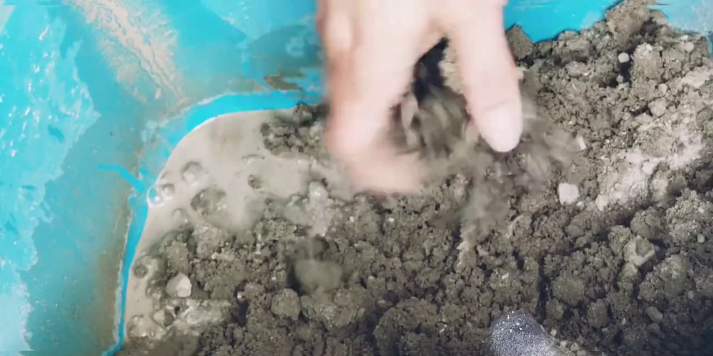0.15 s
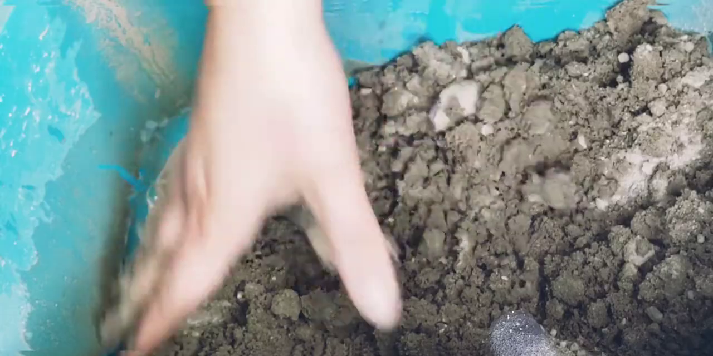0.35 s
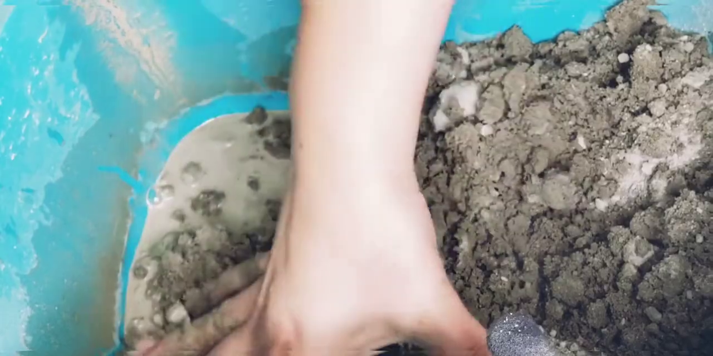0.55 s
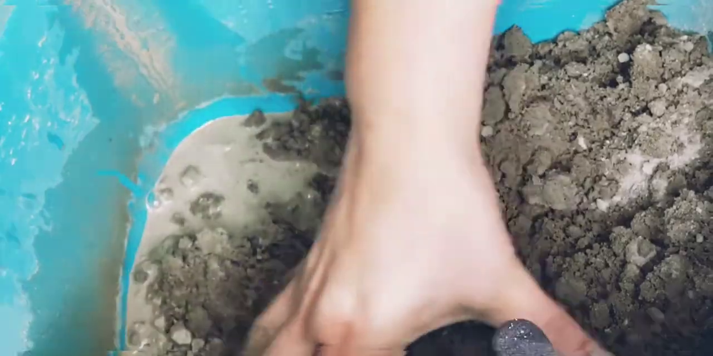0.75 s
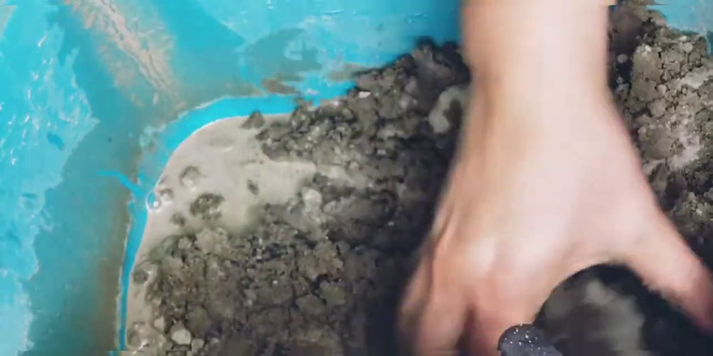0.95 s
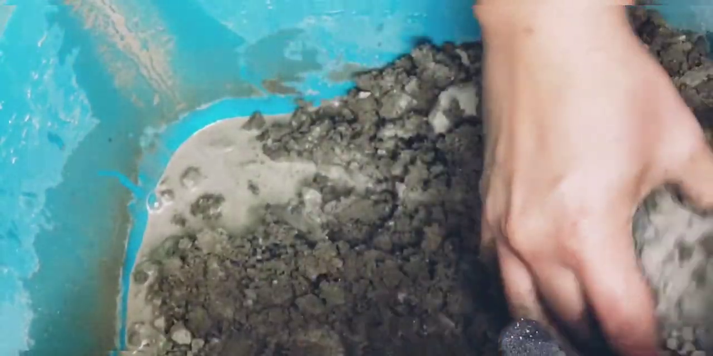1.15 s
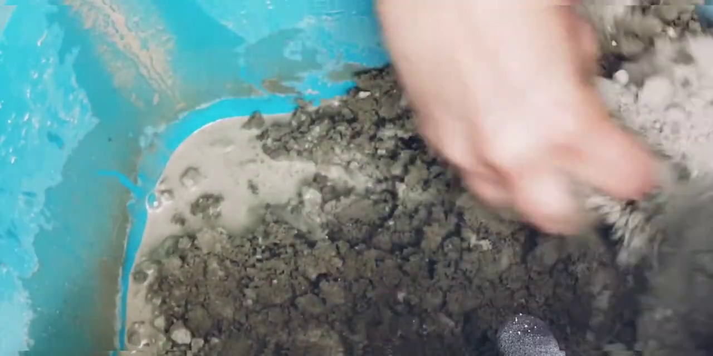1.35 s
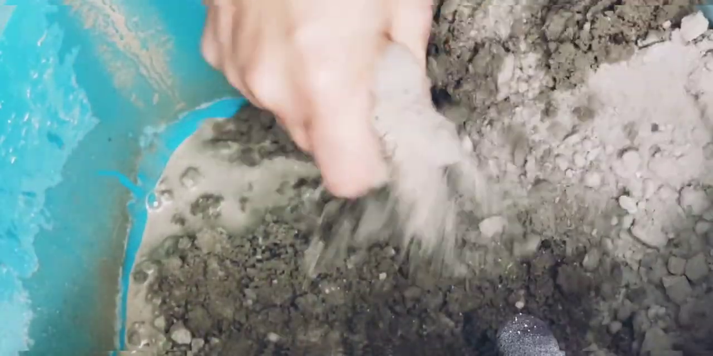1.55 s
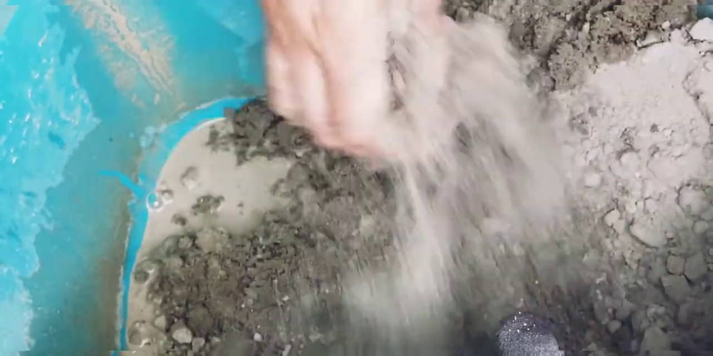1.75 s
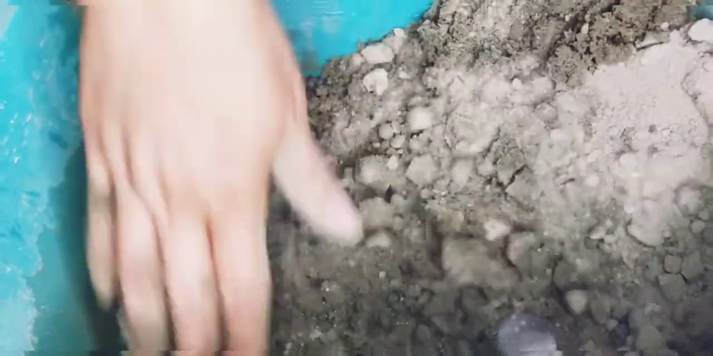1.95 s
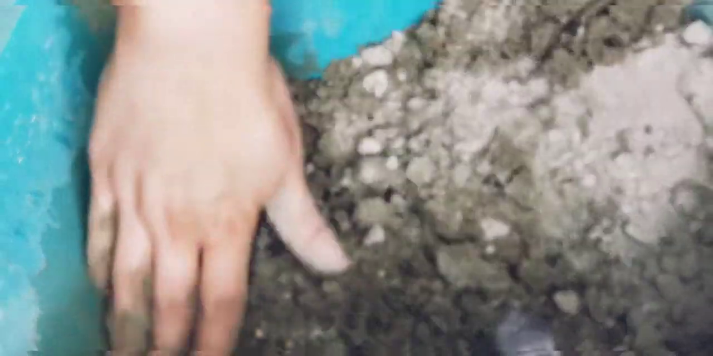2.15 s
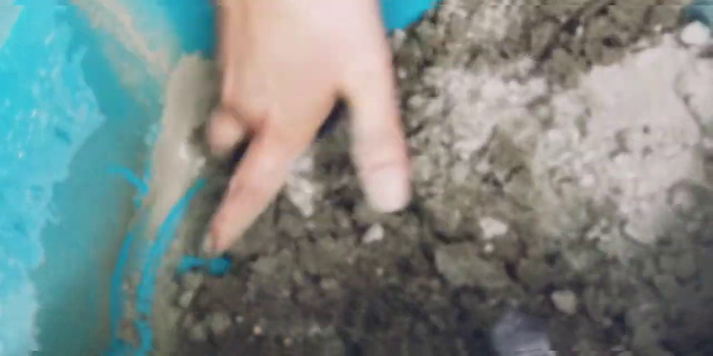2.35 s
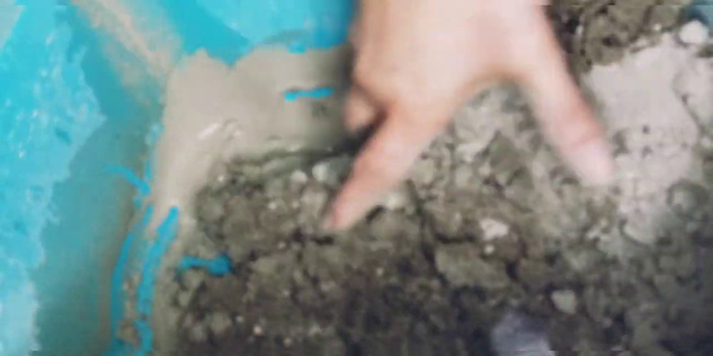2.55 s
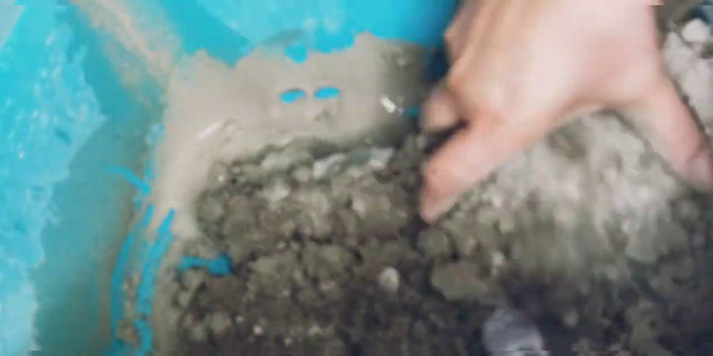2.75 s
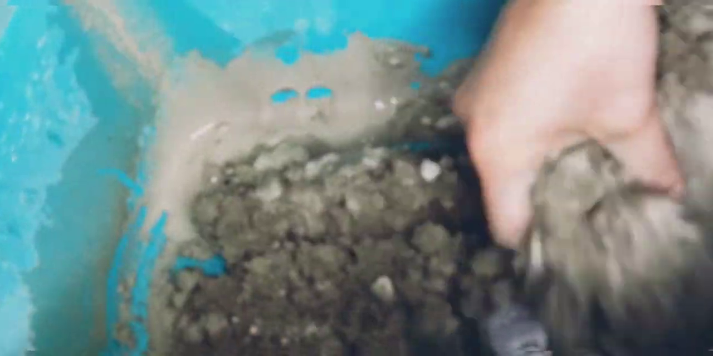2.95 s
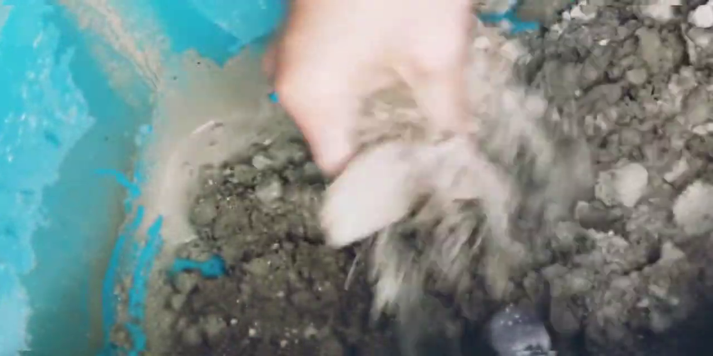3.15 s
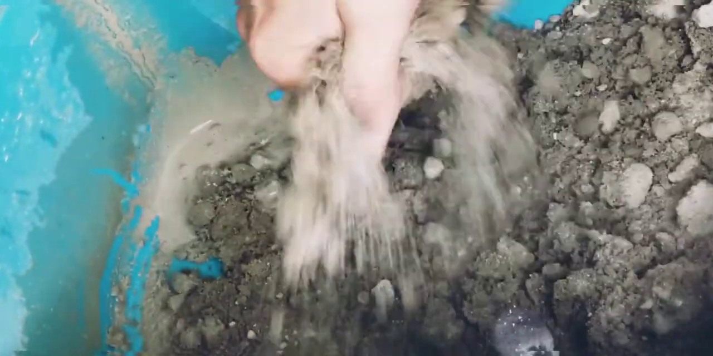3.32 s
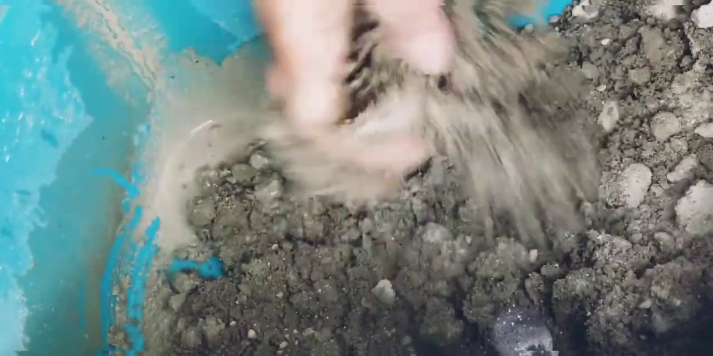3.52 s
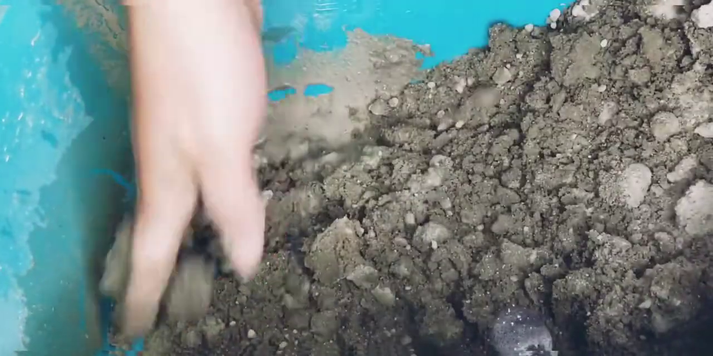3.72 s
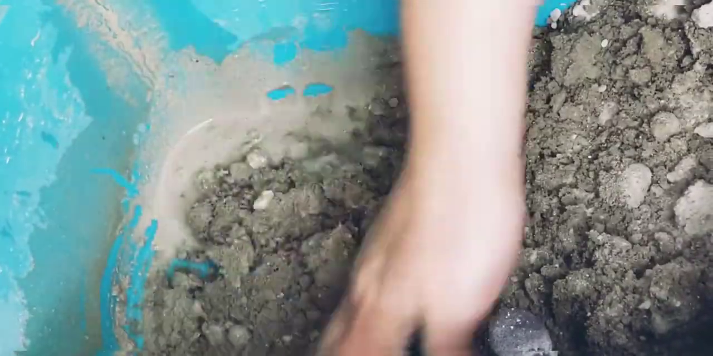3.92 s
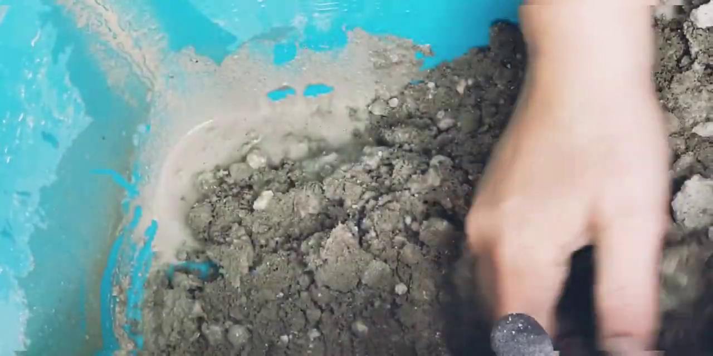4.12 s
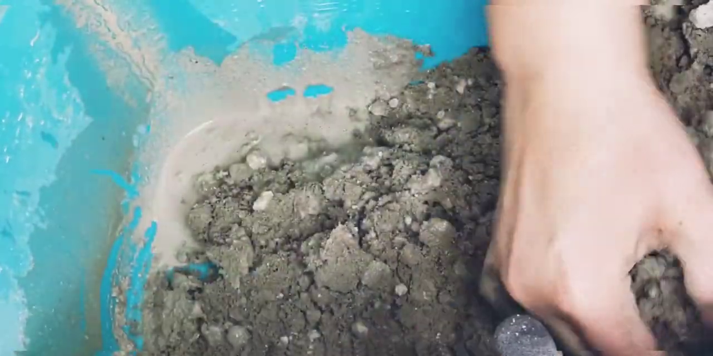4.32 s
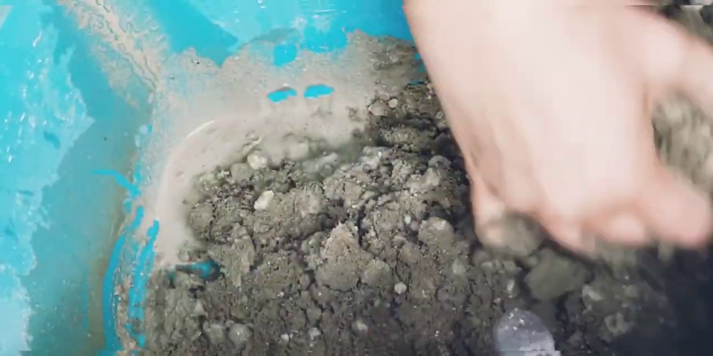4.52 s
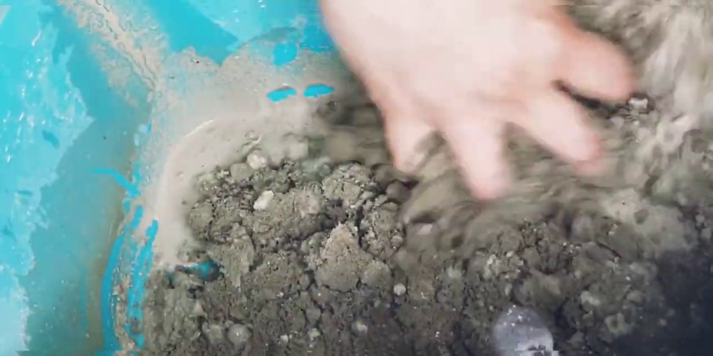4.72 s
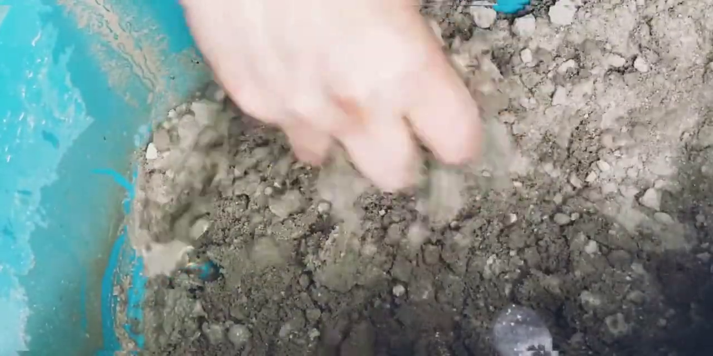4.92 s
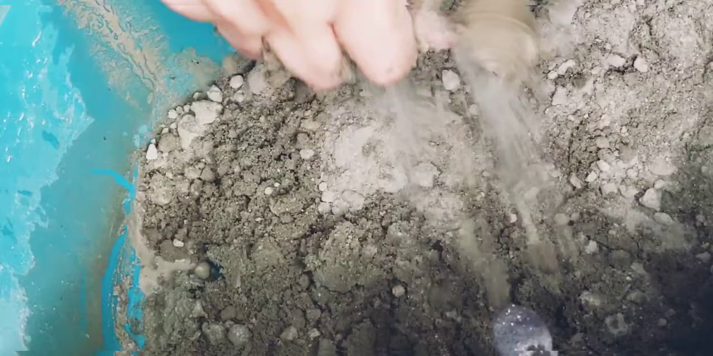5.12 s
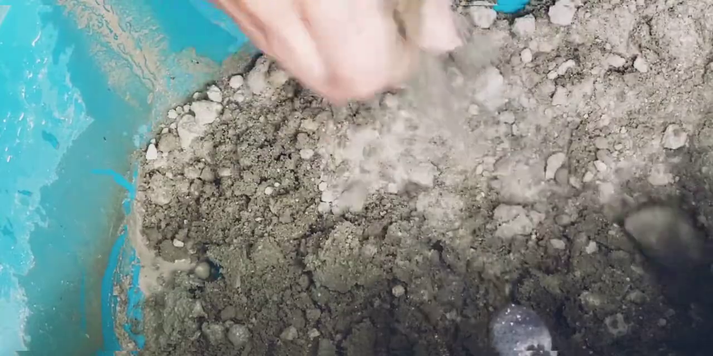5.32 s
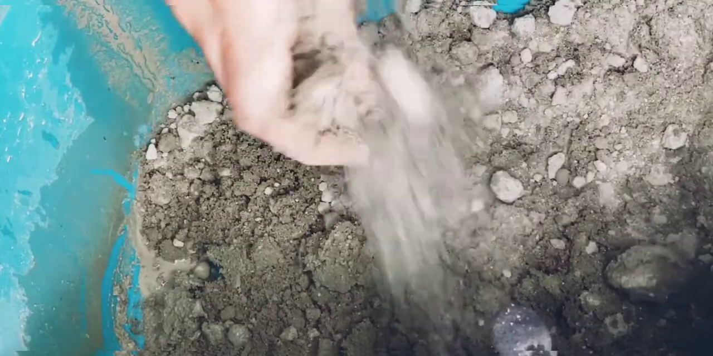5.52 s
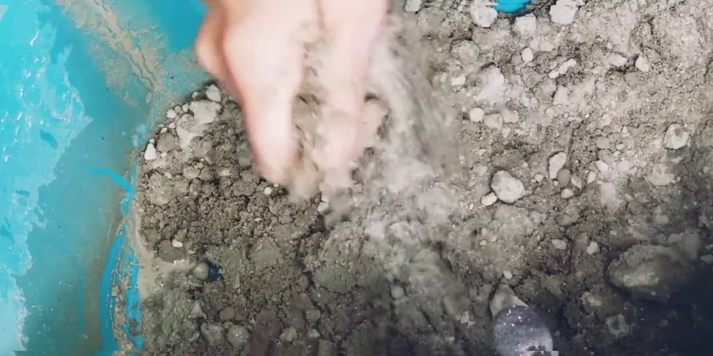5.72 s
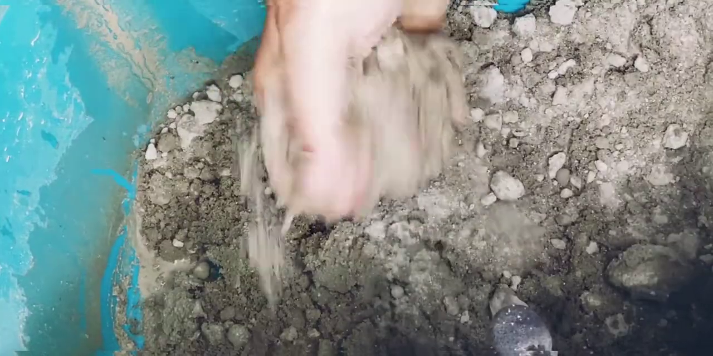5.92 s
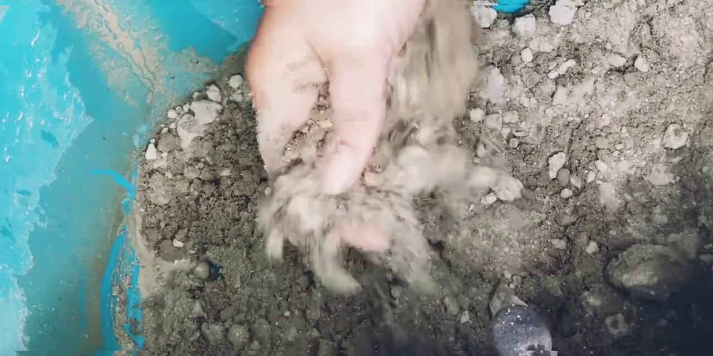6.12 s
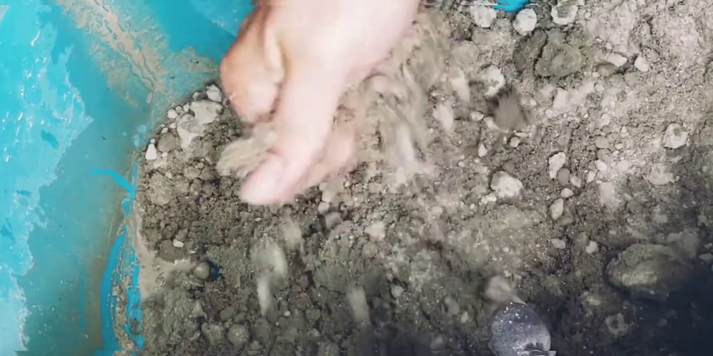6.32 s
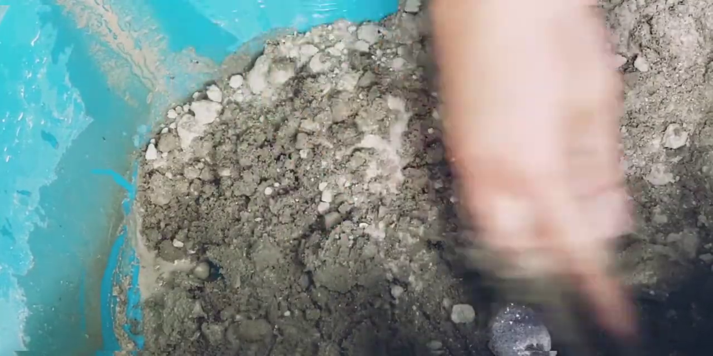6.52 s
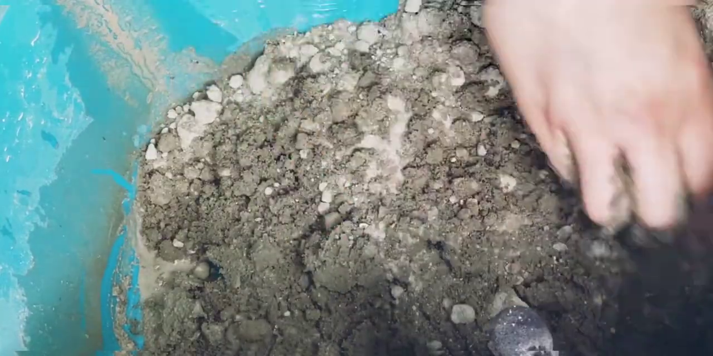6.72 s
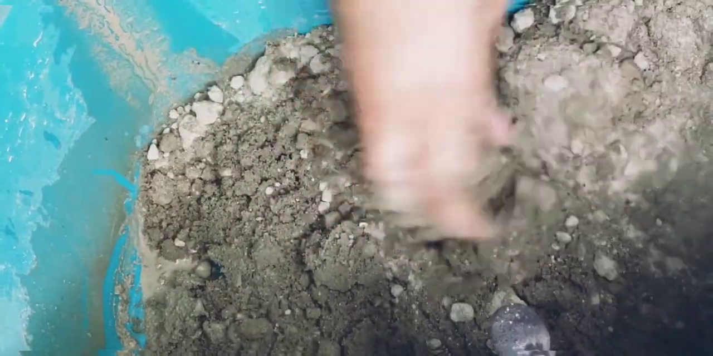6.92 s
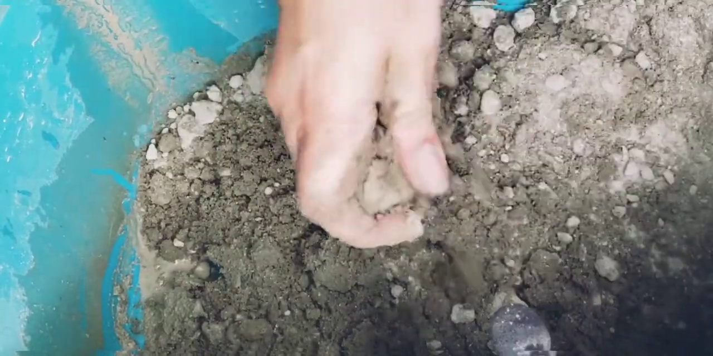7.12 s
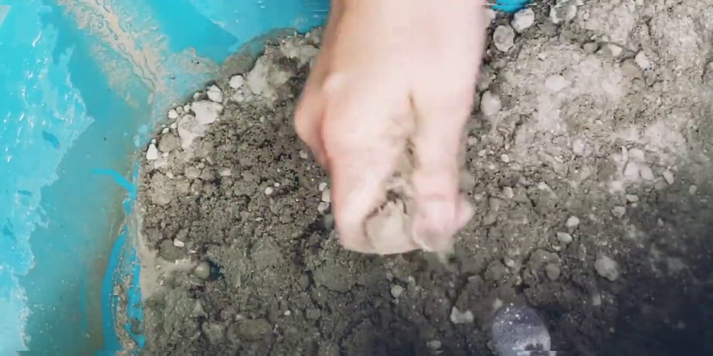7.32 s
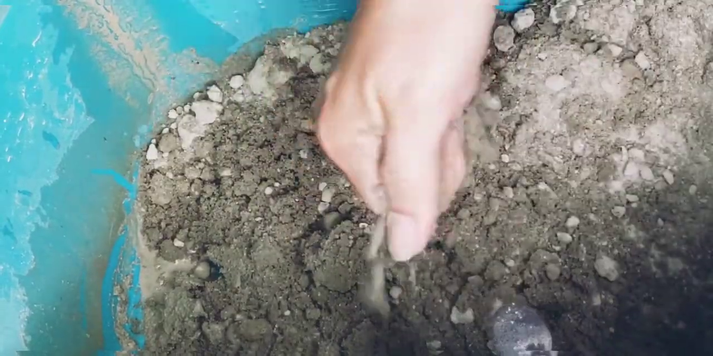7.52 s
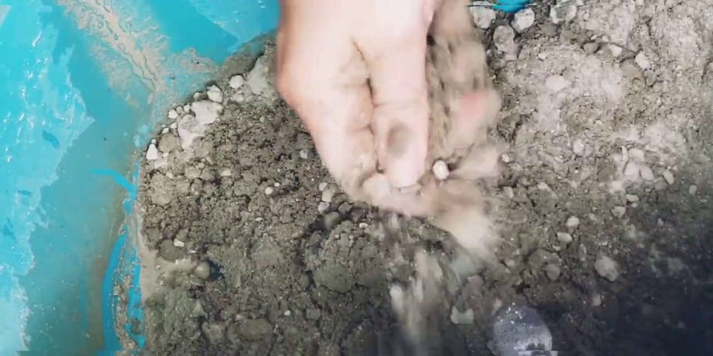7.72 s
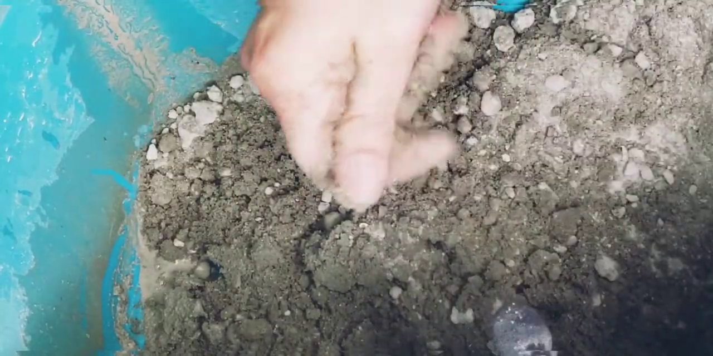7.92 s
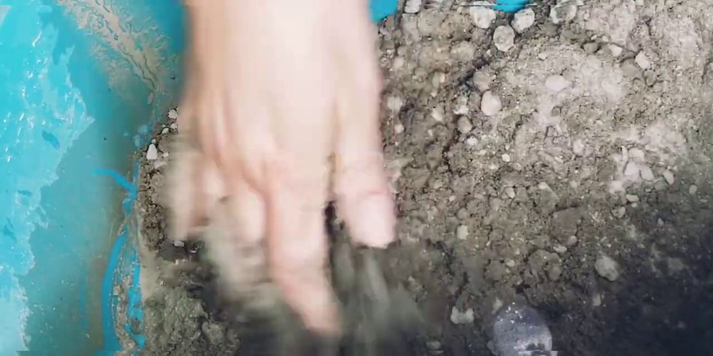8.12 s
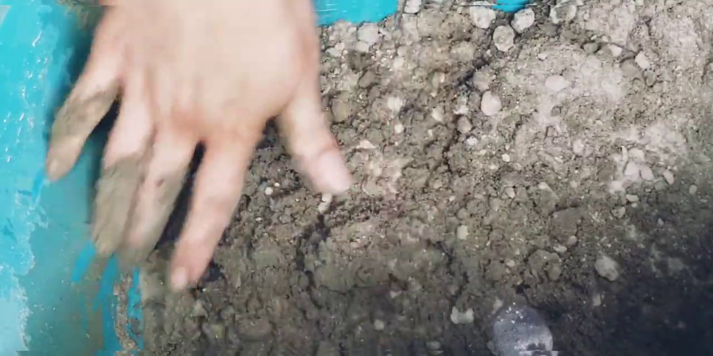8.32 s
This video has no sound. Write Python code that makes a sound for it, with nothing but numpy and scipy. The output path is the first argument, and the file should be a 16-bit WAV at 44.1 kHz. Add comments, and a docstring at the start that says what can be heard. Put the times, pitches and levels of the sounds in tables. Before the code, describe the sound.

Close-up rustling of powder and crumbly soil in a plastic tub: raspy raking strokes, cracking lumps, one brief squeak, and quieter sprinkling.

```python
"""A hand works dry powder and gritty crumbs in a plastic tub, close to a stereo microphone; rumble, hum and hiss stay under it.
Dust falls over a trickle of grain noise heard throughout; from 0.4 s strokes of coloured grains and ringing crumbs rake the floor
with resonant rasps, and clods knock as damped sines, thickly at 1.4 s and loudest at 1.7 s; a lump jolts the tub at 3.3 s.
A third stroke holds one stick-slip squeak at 4.1 s and more knocks; more dust bursts come from 5.5 s,
then a faint stroke at 6.5 s, more knocks at 7.5 s, and a last stroke that swells to the end; hard hits ring the tub's modes."""
import sys
import numpy as np
from scipy import signal
from scipy.fft import rfft, irfft
from scipy.io import wavfile

SR = 44100
rng = np.random.default_rng(int(sys.argv[2]) if len(sys.argv) > 2 else 0)


def digitize_waveform(pressure):
    """Quantize a signal to 16-bit integers and store it at the path in sys.argv[1].

    Rows of a 2-D input are taken as channels; values are limited to [-1, 1].
    """
    field = np.atleast_2d(pressure).T
    bounded = np.clip(field, -1, 1)
    quanta = np.round(bounded * 32767).astype(np.int16)
    wavfile.write(sys.argv[1], SR, quanta)


def linear_from_db(decibels):
    """Turn decibels (scalar or array-like) into linear amplitude factors; 0 gives 1."""
    return 10 ** (np.asarray(decibels, float) / 20)


N = 368676  # samples


def rms_one(x):
    """Scale to unit rms."""
    return x / np.sqrt(np.mean(x ** 2) + 1e-20)


def in_time(rows):
    """Each column of a table as a curve over all samples."""
    s, *columns = np.transpose(rows)
    return [np.interp(np.arange(N) / SR, s, c) for c in columns]


def at_hz(points, hz):
    """Read a spectrum on a log-frequency axis."""
    point_hz, values = np.transpose(points)
    return np.interp(np.log(hz + 1), np.log(point_hz), values)


def colour(x, gain_at, size=4096):
    """Causal (minimum-phase) filter with the given gain per frequency, made by folding the cepstrum."""
    cepstrum = irfft(np.log(gain_at(np.fft.rfftfreq(size, 1 / SR)) + 1e-6))
    cepstrum[1:size // 2] *= 2
    cepstrum[size // 2 + 1:] = 0
    return signal.oaconvolve(x, irfft(np.exp(rfft(cepstrum))))[:N]


# How alike the microphone's two channels hear the tub. Each row: frequency in Hz, left-right likeness (1 = same).
CHANNEL_LIKENESS = [(60, 0.95), (250, 0.92), (640, 0.6), (1000, 0.13), (1500, 0.063), (2800, 0.071),
                    (15000, 0.024)]


def stereo(pair, spectrum):
    """Two unrelated streams become a coloured left and right, alike in the bass and nearly unrelated in the treble."""
    hz = np.linspace(0, SR / 2, 2049)
    norm = np.sqrt(np.mean(linear_from_db(at_hz(spectrum, hz)) ** 2) * 2)
    alike = lambda f: np.clip(at_hz(CHANNEL_LIKENESS, f), -.99, .99)
    mid = colour(pair[0], lambda f: linear_from_db(at_hz(spectrum, f)) * np.sqrt(1 + alike(f)) / norm)
    side = colour(pair[1], lambda f: linear_from_db(at_hz(spectrum, f)) * np.sqrt(1 - alike(f)) / norm)
    return np.array([mid + side, mid - side])


def drift(rate_hz):
    """Slow random wander of rms 1: low-passed noise drawn at every 40th sample."""
    r = np.exp(-80 * np.pi * rate_hz / SR)
    noise = rng.standard_normal(N // 40 + 2002)
    slow = signal.lfilter([1], [1, -2 * r, r * r], noise)[2000:]
    return np.interp(np.arange(N) / 40, np.arange(len(slow)), rms_one(slow))


def grains(per_s, spread_db, clump_db, clump_hz):
    """Random contacts of uneven size that come in clumps; two streams, rms 1."""
    born = rng.random((2, N)) < per_s / SR
    sizes = linear_from_db(spread_db * np.minimum(rng.exponential(1, (2, N)), 5)) * rng.standard_normal((2, N))
    return rms_one(born * sizes * linear_from_db(clump_db * drift(clump_hz)))


# Colour of the faint hiss in the pauses. Each row: frequency in Hz, relative level in dB.
HISS_COLOUR = [(100, -31.5), (160, -7.5), (280, -4.5), (350, -16), (500, -17.5), (900, -20), (1500, -23.5),
               (2500, -9), (3300, -18), (4800, -29.5), (6300, -29), (8300, -39), (11800, -9),
               (15800, -13.5)]


def hiss():
    """Steady coloured noise whose level wanders by about a decibel."""
    return linear_from_db(-59 + 1.0 * drift(4.4)) * stereo(rng.standard_normal((2, N)), HISS_COLOUR)


JOLT_RISE_S = 0.0019


def jolt_swing(after_s, level_db, t60_s):
    """A jolt's quick rise and exponential decay, silent before it strikes."""
    return linear_from_db(level_db - 60 * after_s / t60_s) * (1 - np.exp(-after_s / JOLT_RISE_S))


# Low rumble around the tub. Each row: time in seconds, level in dB.
RUMBLE_LEVEL = [(0.0, -48), (0.39, -54), (0.6, -50.5), (1.0, -45.5), (1.51, -45.5), (1.79, -59.5),
                (2.07, -44), (2.5, -45.5), (2.91, -45.5), (3.21, -58.5), (3.54, -47.5), (3.73, -44.5),
                (4.05, -48.5), (4.65, -57.5), (4.77, -53), (5.2, -52), (5.45, -54), (5.82, -46),
                (5.96, -57.5), (6.29, -44.5), (6.6, -50.5), (7.43, -57), (8.36, -45.5)]
# Its two resonances. Each row: frequency in Hz, width of one filter pass in Hz, rumble gain in dB, jolt gain in dB.
LOW_RESONANCES = [(58.2, 29, -0.9, -5.5), (102, 33, -6, 2.5)]
# Jolts of the tub, which also ring in jolt_rings(). Each row: start in seconds, level in dB.
TUB_JOLTS = [(0.431, -36), (2.071, -50), (2.35, -41), (3.322, -30), (3.805, -30), (4.771, -47.5),
             (5.282, -40.5), (5.78, -50), (7.51, -38)]


def rumble():
    """Noise in two low resonances, nearly the same in both channels; jolts swell it and die away."""
    out, t = 0, np.arange(N) / SR
    level_db, = in_time(RUMBLE_LEVEL)
    jolts = sum(jolt_swing(np.maximum(t - s, 0), db, t60_s=0.36) for s, db in TUB_JOLTS)
    for hz, width_hz, rumble_db, jolt_db in LOW_RESONANCES:
        r = np.exp(-np.pi * width_hz / SR)
        noise = rng.standard_normal((2, N + SR))  # the first second lets the filters settle
        for _ in range(2):
            noise = signal.lfilter([1, 0, -1], [1, -2 * r * np.cos(2 * np.pi * hz / SR), r * r], noise)
        mid, side = rms_one(noise[:, SR:])
        level = linear_from_db(level_db + rumble_db) + linear_from_db(jolt_db) * jolts
        out = out + level * (mid + 0.16 * side * np.array([[1], [-1]]))
    return out


# A low hum that comes and goes. Each row: time in seconds, rms level in dB.
HUM_LEVEL = [(0, -53), (0.68, -58), (0.74, -43.5), (1.2, -48), (1.45, -79), (2.3, -49), (2.4, -47),
             (2.93, -54), (3.1, -79), (3.45, -69), (3.6, -45), (4.0, -49), (4.3, -73), (4.95, -53),
             (5.15, -46.5), (5.45, -61), (6.08, -61), (6.2, -43.5), (7.0, -45), (7.12, -58), (7.6, -52.5),
             (8.0, -43.5), (8.36, -43)]


def hum():
    """A sine near 58 Hz whose pitch wavers slightly."""
    cycles = np.cumsum(58.4 + 0.9 * drift(1.55)) / SR
    return linear_from_db(in_time(HUM_LEVEL)[0]) * np.sqrt(2) * np.sin(2 * np.pi * cycles)


def jolt_rings():
    """The first swing of the jolted tub is a clean 64 Hz ring, quickly damped."""
    out, t = np.zeros(N), np.arange(N) / SR
    for s, db in TUB_JOLTS:
        after = np.maximum(t - s, 0)
        out += jolt_swing(after, db + 8, t60_s=0.11) * np.sin(2 * np.pi * 64 * after)
    return out


# A finger slipping once on the plastic. Each row: time in seconds, slips per second, level in dB.
FINGER_SLIPS = [(4.105, 940, -40), (4.12, 835, -25), (4.135, 805, -28), (4.148, 815, -20),
                (4.157, 1120, -23), (4.168, 950, -25), (4.19, 1060, -42)]
# Colour of the squeak. Each row: frequency in Hz, relative level in dB.
SQUEAK_TONE = [(400, -32), (850, 2), (1500, -7), (2450, -1.5), (3300, -4), (4900, -7), (6000, -24)]


def squeak():
    """Uneven stick-slip pulses while the finger drags, smeared by the short rattle of the loaded floor."""
    per_s, level_db = in_time(FINGER_SLIPS)
    t = np.arange(N) / SR
    turns = np.floor(np.cumsum(per_s * (1 + .02 * drift(120) + .06 * drift(500))) / SR)
    slips = np.diff(turns, prepend=0) * linear_from_db(2.5 * rng.standard_normal(N)) * np.sqrt(SR / per_s)
    slips = slips * linear_from_db(level_db) * (t > FINGER_SLIPS[0][0]) * (t < FINGER_SLIPS[-1][0])
    rattles = rng.standard_normal((4, 2, 400)) * linear_from_db(-60 * t[:400] / .012)
    rattles /= 2 * np.linalg.norm(rattles, axis=2, keepdims=True)
    rattles[:, 1] *= .45  # a weaker side stream keeps the channels mostly alike
    # the load shifts under the finger, so the rattle keeps changing
    loads = np.array([drift(35) for _ in rattles])
    loads *= 2 * slips / np.linalg.norm(loads, axis=0)
    rattled = [np.array([signal.oaconvolve(load, r)[:N] for r in pair]) for load, pair in zip(loads, rattles)]
    return stereo(sum(rattled), SQUEAK_TONE)


# Clods dragged over the floor; the row at 4.16 s is the squeak's upper partial near 2 kHz.
# Each row: start in seconds, length in seconds, level in dB, resonance in Hz.
RASPS_AND_PARTIAL = [(0.919, 0.11, -42, 940), (1.072, 0.048, -35, 520), (2.169, 0.13, -35.5, 512),
                     (2.244, 0.15, -36, 2320), (3.007, 0.08, -47, 940), (4.16, 0.038, -32.5, 1820),
                     (2.946, 0.065, -35.5, 985), (7.191, 0.056, -58.5, 1930)]


def rasps():
    """Dense contacts swell and fade in one resonance: dragged clods, and the squeak's upper partial."""
    out = np.zeros((2, N))
    mid, side = grains(4000, 1.2, 1.5, 40)
    for s, length, db, hz in RASPS_AND_PARTIAL:
        at, size = round(s * SR), round(length * SR)
        contacts = [mid[at:at + size], 0.44 * side[at:at + size]]
        rung = signal.lfilter(*signal.iirpeak(hz, 11.5, fs=SR), contacts)
        swell = np.sin(np.linspace(0, np.pi, size))
        out[:, at:at + size] += linear_from_db(db) * swell * rms_one(rung[0] + rung[1] * [[1], [-1]])
    return out


# Ringing modes of the plastic floor. Each row: frequency in Hz, relative level in dB, 60 dB decay in seconds.
FLOOR_MODES = [(218, -14, 0.1), (357, -8, 0.11), (501.5, 1.5, 0.033), (648, -9.5, 0.059),
               (946, -19.5, 0.14), (1485, -8, 0.077), (2780, -6, 0.057)]


def tub(x):
    """The plastic floor rings in its modes, of alternating sign."""
    out = 0
    for k, (hz, level_db, t60) in enumerate(FLOOR_MODES):
        r, w = linear_from_db(-60 / (t60 * SR)), 2 * np.pi * hz / SR
        strike = [0, linear_from_db(level_db) * np.sin(w)]
        out = out + (-1) ** k * signal.lfilter(strike, [1, -2 * r * np.cos(w), r * r], x + 1e-18)
    return out


# Hard clods striking bare plastic. Each row: start in seconds, level in dB, centre of the knock in Hz,
# second resonance in Hz, cycles of ring until 60 dB down.
CLOD_KNOCKS = [(0.415, -32, 2180, 900, 10), (0.426, -19.5, 2140, 1320, 18), (0.52, -35.5, 570, 1200, 11),
               (1.394, -15.5, 440, 2100, 4.2), (1.407, -18, 453, 1900, 4), (1.42, -17, 570, 2000, 5.4),
               (1.432, -17, 720, 1300, 10), (1.452, -21, 800, 2300, 11), (1.462, -18, 805, 1500, 6.2),
               (1.552, -17.5, 890, 1700, 2.6), (1.698, 0, 5800, 9100, 6.0), (1.759, -14, 7320, 9000, 8.0),
               (1.955, -30, 2930, 7000, 3.7), (2.398, -41, 1250, 900, 4.4), (3.3209, -8.5, 5700, 3670, 19),
               (3.322, -19.5, 216, 330, 19), (3.799, -22, 1500, 4500, 7.7), (4.498, -12, 2780, 1100, 2.1),
               (4.65, -34.5, 496, 1490, 14), (4.67, -27.5, 483, 1290, 15), (4.729, -23.5, 467, 1500, 6.7),
               (4.76, -25, 1300, 2500, 5.3), (4.775, -26.5, 514, 1100, 7.1), (4.811, -21, 394, 1600, 5.8),
               (4.832, -19.5, 480, 1100, 5.1), (4.8391, -11, 1500, 2200, 3.4),
               (4.8585, -12.5, 690, 1600, 3.4), (4.9017, -13, 1320, 2900, 2.7),
               (5.7697, -19.5, 590, 925, 24), (5.89, -20, 660, 910, 5.8), (7.362, -43, 7540, 11000, 5.0),
               (7.505, -25, 322, 1300, 9.3), (7.517, -25, 1030, 1700, 11), (7.5558, -14, 756, 950, 10.3),
               (7.611, -35, 760, 1500, 9.8)]


def knocks():
    """Each clod is one click in two quickly damped resonances, mostly alike in both channels."""
    out, t = np.zeros(N + SR), np.arange(SR // 20) / SR
    for s, db, hz, edge_hz, cycles in CLOD_KNOCKS:
        at = round(s * SR)
        for f, level_db in ((hz, db), (edge_hz, db - 5)):
            t60 = max(cycles / f, .0015)
            envelope = linear_from_db(level_db - 60 * t / t60) * (1 - np.exp(-2 * f * t))
            out[at:at + len(t)] += envelope * np.sin(2 * np.pi * f * t)
    return out[:N] + .15 * np.roll(out[:N], 5) * np.array([[1], [-1]])


# Lumps landing or breaking in the tub. Each row: start in seconds, dust level in dB, crunch level in dB,
# thud level in dB, scatter decay in seconds; landings() trims the levels and stretches the decay.
FALLING_LUMPS = [(0.415, -48, -40, -57, 0.037), (0.426, -30.5, -35, -53, 0.046),
                 (0.517, -29, -41.5, -46, 0.068), (1.394, -34.5, -26.5, -36, 0.058),
                 (1.429, -49, -31, -33.5, 0.12), (1.524, -63, -39.5, -40.5, 0.069),
                 (1.548, -41.5, -39.5, -56, 0.08), (1.697, -22, -32.5, -72, 0.075),
                 (2.058, -30.5, -36, -47, 0.067), (2.832, -27.5, -48, -31, 0.051),
                 (3.3191, -27, -25, -18.5, 0.082), (3.366, -61, -45, -28.5, 0.076),
                 (3.445, -37.5, -72, -35, 0.22), (3.763, -43, -51, -39, 0.11), (3.797, -63, -43, -46, 0.29),
                 (4.495, -29, -35, -93, 0.14), (4.67, -35.5, -30.5, -64, 0.17),
                 (4.728, -36, -37, -55, 0.084), (4.77, -69, -41.5, -41, 0.31),
                 (4.8383, -55, -31.5, -65, 0.044), (4.857, -68, -27, -50, 0.016),
                 (4.9008, -43, -25.5, -46, 0.057), (4.95, -46, -45.5, -65, 0.041),
                 (5.768, -32.5, -34.5, -33.5, 0.14), (5.887, -44.5, -49, -34.5, 0.11),
                 (6.493, -39, -48.5, -48, 0.077), (7.504, -71, -34, -23, 0.081),
                 (7.556, -34, -41, -25.5, 0.099), (7.934, -41.5, -59, -50.5, 0.26),
                 (8.265, -56, -40.5, -37, 0.17)]
# Pinches of dust falling and a few tiny ticks. Each row: start in seconds, dust level in dB, grit level in dB,
# scatter decay in seconds; trimmed and stretched likewise.
PINCHES_AND_TICKS = [(0.054, -44, -67, 0.17), (0.223, -49, -61, 0.12), (0.633, -37.5, -43.5, 0.52),
                     (1.724, -30.5, -32.5, 0.093), (1.758, -31, -43, 0.31), (1.814, -32, -38, 0.16),
                     (1.957, -63, -52, 0.041), (3.1215, -51, -48, 0.036), (3.232, -45, -44.5, 0.16),
                     (3.247, -60, -41.5, 0.082), (5.499, -44, -56, 0.13), (5.527, -40, -67, 0.06),
                     (5.547, -25, -34, 0.15), (5.635, -33.5, -52, 0.067), (5.683, -41, -65, 0.024),
                     (5.725, -42.5, -62, 0.06), (5.987, -37, -89, 0.19), (6.076, -40.5, -67, 0.097),
                     (6.13, -38.5, -70, 0.05), (6.276, -40.5, -50.5, 0.34), (6.527, -43.5, -60, 0.19),
                     (7.201, -44, -61, 0.3), (7.36, -45, -77, 0.49), (7.729, -46, -85, 0.24),
                     (7.795, -38.5, -75, 0.14)]


def bursts():
    """Lumps, pinches and tiny ticks as rows of (s, crack dB, dust dB, grit dB, crunch dB, thud dB, decay s)."""
    rows = []
    for s, dust, crunch, thud, t60 in FALLING_LUMPS:
        grit = dust + 0.5 * (crunch - dust) + 1  # grit lies between dust and crunch
        rows.append((s, 14.5, dust, grit, crunch, thud, t60))
    for s, dust, grit, t60 in PINCHES_AND_TICKS:
        rows.append((s, 15.5, dust, grit, grit - 12.5, grit - 24, t60))
    return rows


def landings(column, boost_db, stretch, snap_db):
    """Every row of bursts() snaps once and bursts into a dying, lumpy scatter of fragments; two streams."""
    out, snaps = np.zeros(N), np.zeros(N)
    for row in bursts():
        at, t60 = round(row[0] * SR), max(row[6] * stretch, .005)
        t = np.arange(min(int(3 * t60 * SR), N - at)) / SR
        decay = linear_from_db(-60 * t / t60) + linear_from_db(-23.5 - 20 * t / t60)  # loosened dust trickles on after the burst
        out[at:at + len(t)] += linear_from_db(row[column] + boost_db) * decay * (1 - np.exp(-t / 0.0028))
        snaps[at + round(.002 * SR)] = linear_from_db(row[column] + row[1] + snap_db)
    return out * grains(12000, 1.54, 1.22, 62) + [snaps, 0.25 * np.roll(snaps, 5)]


def ticks(per_s, cycles, low_hz, high_hz):
    """Single crumbs click and ring a few cycles, each dealt one of 16 pitches with its own channel delay; rms 1."""
    clicks, dealt, out = grains(per_s, 2.2, 1.2, 25)[0], rng.integers(0, 16, N), 0
    for k, hz in enumerate(np.geomspace(low_hz, high_hz, 16)):
        r, w = linear_from_db(-60 * hz / (cycles * SR)), 2 * np.pi * hz / SR
        rung = signal.lfilter([0, np.sin(w)], [1, -2 * r * np.cos(w), r * r], clicks * (dealt == k) + 1e-18)
        out = out + np.array([rung, np.roll(rung, rng.integers(-14, 15))])
    return rms_one(out)


# Raking strokes, one table each. Each row: time in seconds, level of fine powder in dB, level of crumbs in dB.
RAKING_STROKES = [
    [(0.44, -50.5, -55.5), (0.594, -43.5, -55.5), (0.802, -35.5, -49), (0.97, -28.5, -40.5),
     (1.03, -28, -44.5), (1.095, -29, -39.5), (1.17, -36, -44.5), (1.24, -32, -37.5), (1.385, -54.5, -53),
     (1.42, -46, -41.5), (1.526, -51.5, -51), (1.69, -51.5, -79)],
    [(2.05, -76, -50), (2.065, -47, -58), (2.13, -35.5, -56), (2.21, -32.5, -41), (2.293, -31, -41),
     (2.42, -45, -44.5), (2.49, -37.5, -40.5), (2.581, -50.5, -49.5), (2.775, -34.5, -41),
     (2.889, -48, -53), (2.98, -39, -41), (3.055, -43, -53.5), (3.15, -79, -64)],
    [(3.76, -68, -59), (3.8, -34, -44), (3.97, -26.5, -44), (4.1, -27.5, -47.5), (4.2, -29.5, -41),
     (4.31, -33.5, -50.5), (4.39, -32.5, -43), (4.46, -29, -42), (4.54, -48, -47), (4.6, -38, -47),
     (4.808, -43.5, -43.5), (4.98, -63, -53), (5.02, -78, -75)],
    [(6.5, -66, -90), (6.668, -41, -57), (6.806, -49.5, -64), (6.9, -91, -100)],
    [(8.255, -83, -77), (8.275, -59, -54), (8.36, -37, -50)],
]
# Powder trickling from the fingers; scene() also drops crumbs by it. Each row: time in seconds, level in dB.
TRICKLE = [(0, -84), (0.306, -50.5), (0.405, -88), (1.5, -50), (1.7, -53.5), (2.045, -46), (3.05, -58),
           (3.31, -44), (3.34, -34), (3.498, -60), (3.76, -62.5), (4.98, -52), (5.068, -53), (5.54, -68.5),
           (5.688, -51), (6.012, -60.5), (6.236, -48.5), (6.48, -65), (7.05, -90), (7.1, -54), (7.19, -65),
           (7.31, -59), (7.495, -53), (7.58, -62), (7.876, -53), (8.022, -66), (8.36, -64)]


def hand():
    """Gains of powder, grit, crunch and push: raking strokes added to the trickle from the fingers."""
    trickle_db, = in_time(TRICKLE)
    gains = linear_from_db(trickle_db + np.array([[0], [-18], [-48], [-99]]))
    gains[3] = linear_from_db(-66.5)  # steady faint low noise under the pushes
    t = np.arange(N) / SR
    for stroke in RAKING_STROKES:
        powder_db, crumbs_db = in_time(stroke)
        grit_db = powder_db + 0.84 * (crumbs_db - powder_db) + 0.5  # grit lies between powder and crumbs
        push_db = crumbs_db - 7.5  # crumbs push the floor
        during = (t >= stroke[0][0]) * (t <= stroke[-1][0])
        gains += linear_from_db(np.array([powder_db, grit_db, crumbs_db, push_db])) * during
    return gains


# Colour of fine powder. Each row: frequency in Hz, relative level in dB per Hz.
POWDER_COLOUR = [(2500, -15.5), (4600, -4.5), (6000, 0.9), (8300, -2.5), (10000, 0.5), (11800, 6),
                 (13000, 2.5), (14500, 0.5), (15800, 1.5)]
# Colour of grit. Each row: frequency in Hz, relative level in dB per Hz.
GRIT_COLOUR = [(900, -25.5), (1400, -8), (2400, -2), (3300, -5), (4500, -8), (7000, -34.5)]
# Colour of crunching crumbs. Each row: frequency in Hz, relative level in dB per Hz.
CRUNCH_COLOUR = [(280, -29.5), (400, -4.5), (500, 6.5), (700, -3.5), (1000, -0.5), (1500, -6), (2500, -7.5),
                 (4500, -41.5)]
# Colour of the pushed floor. Each row: frequency in Hz, relative level in dB per Hz.
PUSH_COLOUR = [(120, -26.5), (165, -13.5), (210, 1.5), (270, -6), (340, -6), (420, -15.5), (800, -30)]
# Where the hand is. Each row: time in seconds, lean to the left in dB, counted from 6.5 dB as the zero point.
HAND_PLACE = [(0.0, 5), (4.51, 5), (4.89, 6), (7.94, 4), (8.36, 3.5)]


def scene():
    """Powder, grit, crumbs and tub share the hand's place; hiss, rumble, hum and jolt rings stay put."""
    powder, grit, crunch, push = hand()
    # single crumbs under the hand, then single crumbs in the trickle
    crumbs = grit * ticks(per_s=1600, cycles=22, low_hz=650, high_hz=6000)
    trickle_db, = in_time(TRICKLE)
    crumbs += linear_from_db(trickle_db - 16.5) * ticks(per_s=110, cycles=22, low_hz=3280, high_hz=12700)
    # crumbs breaking under the hand sound in powder, grit and crunch at once
    cracks = grains(700, 1.8, 2.0, 15)
    powder = powder * (grains(20000, 1.3, 2.0, 14) + .12 * cracks)
    grit = grit * (grains(3000, 2.2, 1.2, 20) + .4 * cracks)
    crunch = crunch * (grains(3000, 1.3, 0.9, 30) + .2 * cracks)
    push = push * grains(600, 1.2, 3.0, 14)
    powder += landings(column=2, boost_db=1.0, stretch=1.0, snap_db=3.0)
    grit += landings(column=3, boost_db=-1.5, stretch=0.97, snap_db=-22.0)
    crunch += landings(column=4, boost_db=3.5, stretch=1.25, snap_db=9.0)
    push += landings(column=5, boost_db=-2.5, stretch=1.33, snap_db=3.5)
    floor_ring = linear_from_db(-33.0) * tub(crunch[0] + 1.1 * knocks()[0])
    near = floor_ring + squeak() + knocks() + rasps() + crumbs
    near = near + stereo(powder, POWDER_COLOUR) + stereo(grit, GRIT_COLOUR)
    near = near + stereo(crunch, CRUNCH_COLOUR) + stereo(push, PUSH_COLOUR)
    lean_db = in_time(HAND_PLACE)[0] - 6.5
    near = near * linear_from_db(0.5 * lean_db * [[1], [-1]])
    return near + hiss() + rumble() + hum() + jolt_rings()


def top_cut(x):
    """Nothing passes above the cut-off."""
    return signal.sosfilt(signal.butter(12, 17010, fs=SR, output="sos"), x)


# How the stereo microphone leans. Each row: frequency in Hz, left minus right in dB.
MICROPHONE_LEAN = [(60, 2), (300, 4), (1500, 7), (3000, 9), (5000, 2.5), (8000, 7.5), (11000, -4),
                   (15000, 5.5)]


def record(dry):
    """The two channels lean differently by frequency, peaks are rounded and the top is cut at 15.8 kHz."""
    channels = np.array([colour(x, lambda f: linear_from_db(sign * at_hz(MICROPHONE_LEAN, f) / 2))
                         for x, sign in zip(dry, (1, -1))])
    rounded = .6 * np.tanh(channels / .6)
    low_pass = signal.ellip(12, .5, 45, 15800, fs=SR, output="sos")
    finished = signal.sosfilt(low_pass, rounded)
    return top_cut(finished)


dry = scene()
out = record(dry)
digitize_waveform(out)
```